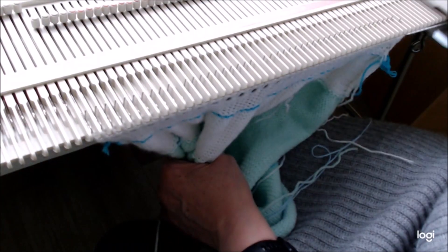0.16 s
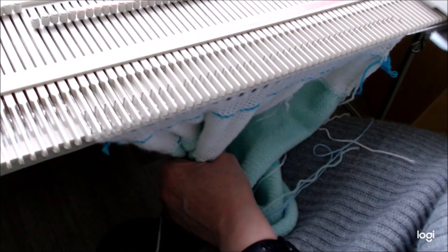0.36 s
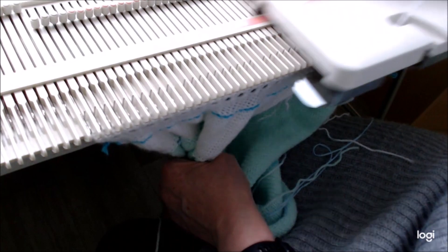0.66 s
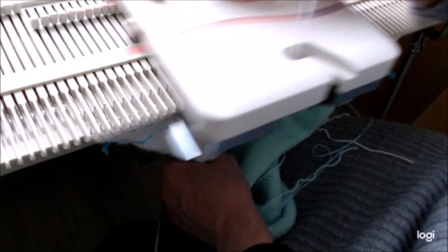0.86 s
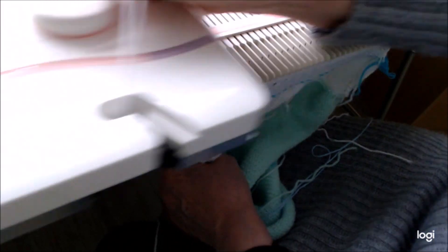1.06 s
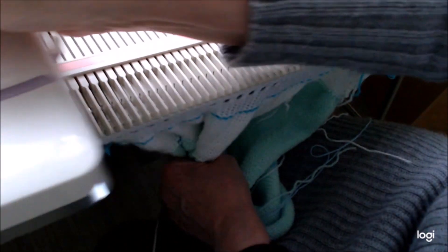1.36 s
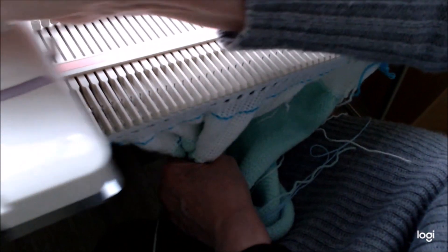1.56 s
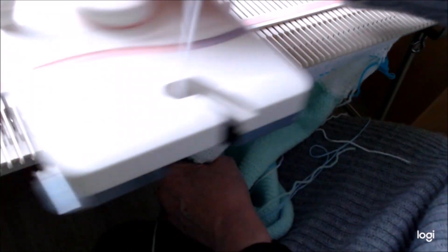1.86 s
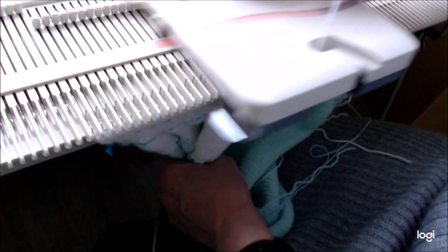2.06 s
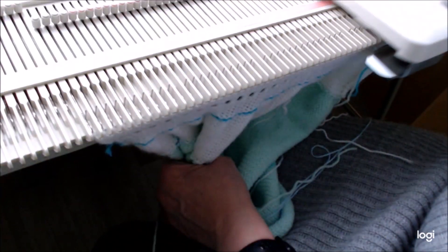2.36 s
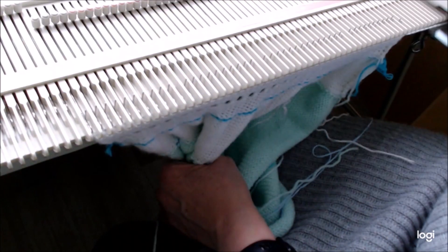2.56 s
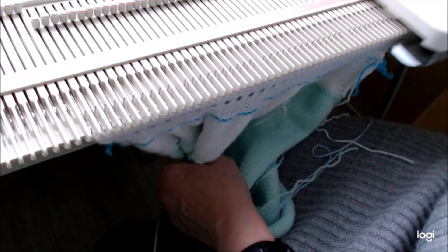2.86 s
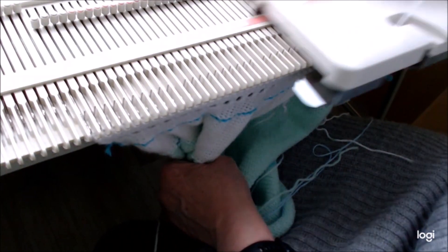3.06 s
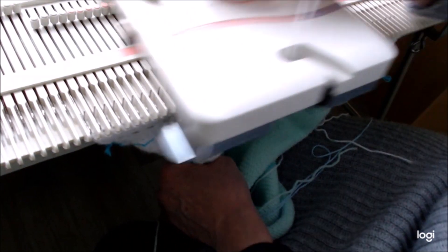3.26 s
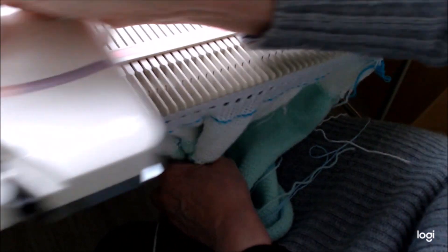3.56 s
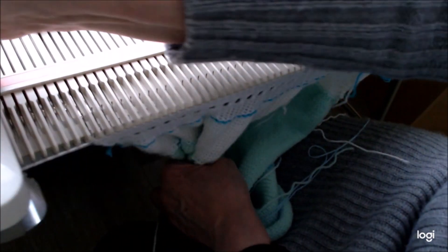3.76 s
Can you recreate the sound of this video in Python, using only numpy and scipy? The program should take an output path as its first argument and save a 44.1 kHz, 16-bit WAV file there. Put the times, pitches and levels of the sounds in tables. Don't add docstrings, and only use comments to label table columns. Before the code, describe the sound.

A knitting machine carriage is shoved back and forth over steel needles, clattering loudly between sharp lever clacks.

```python
import sys
import numpy as np
from scipy import signal
from scipy.fft import rfft, irfft, next_fast_len
from scipy.io import wavfile
from scipy.ndimage import uniform_filter1d, map_coordinates

SR = 44100
rng = np.random.default_rng(int(sys.argv[2]) if len(sys.argv) > 2 else 0)


def bounce(signal):
    frames = np.transpose(np.atleast_2d(signal))
    limited = np.clip(frames, -1, 1)
    pcm = np.round(limited * 32767).astype(np.int16)
    wavfile.write(sys.argv[1], SR, pcm)


def attenuation_scalar(level_db):
    decades = np.asarray(level_db, float) / 20
    return 10 ** decades


N = 171990


def unit(x):
    return x / np.sqrt(np.mean(x ** 2) + 1e-20)


def along(points, hz):
    freq_hz, value = np.transpose(points)
    return np.interp(np.log(hz + 1), np.log(freq_hz + 1), value)


def wobble(rate_hz):
    knots = rng.standard_normal(int(N * rate_hz / SR) + 4)
    return map_coordinates(knots, [np.arange(N) * rate_hz / SR])


def swell(start_s, length_s):
    progress = np.clip((np.arange(N) / SR - start_s) / length_s, 0, 1)
    return np.sin(np.pi * progress) ** .6


def filtered(x, response):
    m = next_fast_len(x.shape[-1] + SR // 4)
    spectrum = rfft(x, m) * response(np.fft.rfftfreq(m, 1 / SR))
    return irfft(spectrum, m)[..., :x.shape[-1]]


def causal(points):
    def response(hz):
        cepstrum = irfft(along(points, hz).clip(-90, 30) * np.log(10) / 20)
        half = len(cepstrum) // 2
        cepstrum[1:half] *= 2
        cepstrum[half + 1:] = 0
        return np.exp(rfft(cepstrum))
    return response


def resonant(peaks, hz):
    total = 1
    for centre_hz, width_hz, level_db in peaks:
        damping = 1j * hz * width_hz
        total = total + attenuation_scalar(level_db) * damping / (centre_hz ** 2 - hz ** 2 + damping)
    return total


# freq_hz [Hz], likeness [0 to 1]
LIKENESS = [(40, 0.08), (150, 0.43), (350, 0.62), (700, .55), (1400, 0), (4000, 0)]


def spread(pair):
    def mid_side(hz):
        angle = np.arccos(np.clip(along(LIKENESS, hz), -1, 1)) / 2
        return np.array([np.cos(angle), np.sin(angle)])
    mid, side = filtered(pair, mid_side)
    return np.array([mid + side, mid - side])


# freq_hz [Hz], t60_s [s]
ROOM_T60 = [(100, 0.22), (600, 0.36), (3000, 0.24), (10000, 0.19)]


def room(x):
    hz, t, z = signal.stft(rng.standard_normal((2, SR // 2)), SR, nperseg=256)
    decay = attenuation_scalar(-60 * t / along(ROOM_T60, hz)[:, None])
    tail = signal.istft(z * decay, SR, nperseg=256)[1]
    return signal.fftconvolve(x, tail / np.linalg.norm(tail[0]), axes=1)


def patchy(x):
    z = signal.stft(x, nperseg=1024)[2]
    field = uniform_filter1d(rng.standard_normal(z.shape[1:]), size=4, axis=0)
    field = uniform_filter1d(field, size=6, axis=1)
    return signal.istft(z * attenuation_scalar(2.1 * unit(field)), nperseg=1024)[1][:, :N]


# start_s [s], level_db [bed dB], weight_db [table re bed dB], bright_db [needles re bed dB]
STROKES = [
    [(.423, -36.5, 8, 14.5), (.5, -23, -2, 5), (.59, -15, 0, 4), (.75, -17, 0.5, 2), (1.01, -17.5, -1.5, 2),
     (1.15, -24.5, -5, -2), (1.25, -28, -0.5, -5.5), (1.31, -37.5, -5.5, -8.5), (1.49, -72.5, -8, 7)],
    [(1.588, -49, -17, 19), (1.63, -23, -22, -8.5), (1.72, -21, -9, 1.5), (1.78, -14.5, -1.5, 1.5),
     (1.95, -16.5, -2, 1), (2.2, -16, -3.5, 2), (2.35, -24.5, -8, -1), (2.42, -33, 2, -2),
     (2.65, -65.5, 15, -2)],
    [(2.812, -34, -2, 12.5), (2.9, -24.5, -5, 5), (2.98, -17, 0, 5), (3.2, -14.5, 1.5, 0),
     (3.42, -15.5, -3.5, 2), (3.53, -22, -2.5, -6), (3.61, -28, -5, -15), (3.73, -50.5, 1.5, -18),
     (3.9, -71, 12, -3)],
]
# start_s [s], level_db [bed dB], weight_db [table re bed dB], bright_db [needles re bed dB]
SLACK = [
    [(0, -34, 0.96, 2), (.12, -40.5, 5, -2), (.262, -68, 6.9, 4)],
    [(.272, -62, -3, 9), (.36, -59, -5, 18), (.421, -48, 6, 8.1)],
    [(1.494, -67.5, 0, 10), (1.55, -56.5, -7, 9), (1.586, -50, -11, 17)],
    [(2.68, -52, -7, 2.3), (2.77, -59, -2.5, 15), (2.81, -48, -8, 16)],
]
# start_s [s], level_db [bed dB], weight_db [table re bed dB], bright_db [needles re bed dB]
RESTS = [
    (.2, -51.5, 5, -2),
    (.22, -58, 8, -4),
    (1.43, -51, 2.3, -8),
    (2.57, -47.5, 6.7, 3),
    (2.595, -56.5, 12, -6),
    (3.7, -42, 1.7, -2),
    (3.76, -71.5, 12, -15.5),
]
# freq_hz [Hz], level_db [dB per Hz]
CLATTER_COLOUR = [(200, -24), (450, -8), (900, -4.5), (1400, -6.5), (3000, -10), (6000, -15.5),
                  (15700, -21.5)]
# freq_hz [Hz], level_db [dB per Hz]
TABLE_COLOUR = [(13, -24), (22, -5.5), (146, -2.5), (178, -5), (274, -1), (304, -2.5), (500, -5.5),
                (650, -13.5), (1100, -120)]
# freq_hz [Hz], width_hz [Hz], level_db [dB]
BED_MODES = [(131, 36, -3.5), (191, 36, -4), (349, 26, -7.5), (701, 130, 0.5), (820, 58, -21.5),
             (1185, 150, -10.5), (2180, 110, -24), (5700, 1300, -9.5)]


def carriage():
    rows = sorted(row for part in STROKES + SLACK + [RESTS] for row in part)
    start_s, *columns = np.transpose(rows)
    level_db, weight_db, bright_db = (np.interp(np.arange(N) / SR, start_s, c) for c in columns)

    hits_per_s, scatter_db, slide_db = 1800, 3, 2
    draw = rng.random((3, 2, N))
    size = attenuation_scalar(-scatter_db * np.log(draw[2] + 0.034))
    blows = (draw[0] < hits_per_s / SR) * np.sign(draw[1] - .5) * size
    drive = unit(blows) + attenuation_scalar(slide_db) * rng.standard_normal((2, N))
    clatter = filtered(drive, lambda hz: causal(CLATTER_COLOUR)(hz) * resonant(BED_MODES, hz))
    clatter = patchy(spread(clatter))

    split_hz = 1580
    bed = filtered(clatter, lambda hz: 1 / (1 + (hz / split_hz) ** 4))
    rumble = filtered(rng.standard_normal((2, N)),
                      lambda hz: attenuation_scalar(along(TABLE_COLOUR, hz)) * resonant(BED_MODES, hz))
    rumble = unit(spread(rumble))
    uneven = attenuation_scalar(.6 * wobble(25) + 1.1 * wobble(70) + .8 * wobble(200))
    steel = attenuation_scalar(bright_db + 2.0 + 0.81 * wobble(40)) * unit(clatter - bed)

    fizz_hz, fizz_db, fizz_grows = 7300, -7.5, 3.3
    chatter = filtered(blows ** 2 * np.sign(blows), lambda hz: 1 / (1 + (fizz_hz / (hz + 1)) ** 8))
    needle_db = level_db + bright_db
    steel = steel + attenuation_scalar(fizz_db + fizz_grows * (needle_db - needle_db.max())) * unit(chatter)

    ringing = uneven * (attenuation_scalar(0.8) * unit(bed) + steel)
    loaded = attenuation_scalar(weight_db + 0.8 + 3.0 * wobble(13)) * rumble
    return uneven * shell_rattle(clatter) + attenuation_scalar(level_db) * (ringing + loaded)


# start_s [s], length_s [s], pitch_hz [Hz], level_db [rms dB]
DRONES = [(0, 0.077, 128.6, -40), (0.636, 0.13, 736, -28.5), (0.873, .24, 170.5, -21),
          (1.079, 0.17, 732, -35.5), (1.11, 0.13, 131, -30.5), (1.33, 0.23, 129, -48),
          (1.855, 0.25, 275.1, -22.5), (1.863, 0.072, 676, -25.5), (2.194, 0.15, 176.7, -27.5),
          (3.46, 0.32, 130.7, -45), (3.09, 0.3, 184.2, -30)]
# start_s [s], length_s [s], pitch_hz [Hz], level_db [rms dB]
CREAKS = [
    (.15, .06, 340, -45),
    (1.524, .03, 1120, -50),
    (2.61, .09, 455, -52),
    (2.63, .05, 370, -54),
    (2.69, .07, 1110, -53),
    (3.79, .03, 470, -50),
    (3.78, .055, 335, -59),
    (3.885, .03, 460, -57),
    (3.73, .17, 500, -62),
    (3.73, .14, 1270, -64),
]


def drones():
    out, drift = np.zeros((2, N)), wobble(30)
    rough = np.array([wobble(35), wobble(35)])
    waver, rough_db = 0.0113, 2.5
    for k, (start_s, length_s, pitch_hz, level_db) in enumerate(DRONES + CREAKS):
        shift = k * SR // 7
        phase = 2 * np.pi * np.cumsum(pitch_hz * (1 + waver * np.roll(drift, shift))) / SR
        level = attenuation_scalar(level_db + 6.5 + rough_db * np.roll(rough, shift, axis=1))
        out += level * swell(start_s, length_s) * np.sin([phase, phase + 1.1])
    return out


# freq_hz [Hz], level_db [dB per Hz]
HUSH_COLOUR = [(15, -33.5), (25, -13.5), (538, -2.5), (1340, -9), (1760, -28), (15600, -52)]


def hush():
    noise = filtered(rng.standard_normal((2, N)), lambda hz: attenuation_scalar(along(HUSH_COLOUR, hz)))
    return attenuation_scalar(-86) * unit(noise)


# start_s [s], level_db [peak dB], t60_s [s]
TICKS = [(0.1074, -31, 0.035), (0.1735, -31, 0.038), (0.2728, -33, 0.035), (0.2834, -36, 0.043),
         (0.3162, -35, 0.035), (0.3297, -28, 0.035), (0.3474, -35, 0.027), (0.3664, -29, 0.048),
         (0.374, -34, 0.035), (0.3922, -26, 0.041), (1.1129, -7.5, 0.028), (1.1474, -19, 0.032),
         (1.1856, -8, 0.026), (1.235, -9.5, 0.028), (1.2664, -24, 0.035), (1.3724, -22, 0.05),
         (1.3894, -23.5, 0.035), (1.496, -38, 0.032), (1.5259, -27, 0.035), (1.5592, -16, 0.028),
         (1.577, -16.5, 0.032), (1.6192, -11.5, 0.035), (2.3496, -13, 0.032), (2.362, -12.5, 0.035),
         (2.375, -26, 0.026), (2.5272, -26, 0.04), (2.643, -40, 0.038), (2.6808, -38.5, 0.035),
         (2.7014, -41, 0.035), (2.7146, -28.5, 0.042), (2.7585, -28, 0.032), (2.781, -20, 0.029),
         (3.5174, -8, 0.031), (3.5538, -11, 0.05), (3.655, -29, 0.038), (3.6795, -18, 0.031),
         (3.6984, -31, 0.028), (3.842, -33, 0.074),
         (.0353, -24, .03),
    (.2568, -45, .012),
    (2.7905, -25, .02),
    (3.8272, -48, .012),
]
# freq_hz [Hz], width_hz [Hz], level_db [dB]
NEEDLE_MODES = [(2250, 300, 22), (3100, 350, 19), (4830, 300, 18), (6200, 510, 6)]


def needles():
    out, t = np.zeros((2, N + SR)), np.arange(SR // 12) / SR
    rise_s = .0007
    for start_s, level_db, t60_s in TICKS:
        envelope = attenuation_scalar(-60 * t / t60_s) * (1 - np.exp(-t / rise_s))
        burst = rng.standard_normal((2, len(t))) * envelope
        modes = [(hz, width, level + rng.normal(0, 2.4)) for hz, width, level in NEEDLE_MODES]
        burst = filtered(burst, lambda hz: resonant(modes, hz) * (1j * hz / (1j * hz + 1400)) ** 2)
        out[:, round(start_s * SR):][:, :len(t)] += attenuation_scalar(level_db + 1.5) * burst / np.abs(burst).max()
    return out[:, :N]


# start_s [s], level_db [peak dB], pan_db [left-right dB]
CLACKS = [(0.047, 0, -3.5), (0.422, -2, -5), (1.318, -17, -15.5), (1.326, -2, 1), (1.341, -14.5, -1),
          (1.587, -7, 0), (2.434, -1, -3), (2.81, -4, -5.5), (3.613, -14.5, -3), (3.621, -2.5, 2.5),
          (3.64, -14, 1.5)]
# freq_hz [Hz], width_hz [Hz], level_db [dB]
LEVER_MODES = [(710, 150, 15.5), (1070, 170, 16.5), (1684, 750, 4), (2410, 260, 3), (3070, 220, -5),
               (4440, 290, 2.5)]
# freq_hz [Hz], level_db [dB per Hz]
LEVER_COLOUR = [(150, -26), (500, -10), (1500, 0.5), (3100, 1), (4500, -7.5), (7000, -7.5), (15700, -12)]


def levers():
    out, t = np.zeros((2, N + SR)), np.arange(SR // 8) / SR
    crackle_s, t60_s, wet_db = .005, .024, -3
    for start_s, level_db, pan_db in CLACKS:
        burst = rng.standard_normal((2, len(t))) * attenuation_scalar(-60 * np.maximum(t - crackle_s, 0) / t60_s)
        burst = burst + 0.22 * burst[::-1]
        burst = filtered(burst, lambda hz: causal(LEVER_COLOUR)(hz) * resonant(LEVER_MODES, hz))
        burst = burst / np.abs(burst).max() * attenuation_scalar([[pan_db / 2], [-pan_db / 2]])
        sound = attenuation_scalar(wet_db) * room(burst)
        sound[:, :len(t)] += burst
        out[:, round(start_s * SR):][:, :sound.shape[1]] += attenuation_scalar(level_db - 3.5) * sound
    return out[:, :N]


# start_s [s], level_db [peak dB], pan_db [left-right dB]
CRACKS = [(0.514, -20, 0.5), (0.5346, 2.5, 2.5), (0.663, -5.5, 0.5), (0.7224, -14, 10.5), (0.7822, -12, 1),
          (0.818, -2, 3), (0.8537, -2, -3.5), (0.9242, -7.5, -5.5), (0.9588, -23, 7), (0.9872, -11, 0.5),
          (1.1129, -30, 1), (1.1853, -19.5, 4), (1.2362, -30, -4), (1.3185, -29, -2), (1.5589, -30, 0.5),
          (1.5895, -29.5, -5), (1.733, -23, 8), (1.7705, -19.5, 10.5), (1.9156, -40, -6),
          (1.9305, -14.5, -12), (1.947, -3, 4), (1.9894, -8, 0), (2.0344, -4, -12), (2.0464, -10, -3),
          (2.0916, -7.5, 5), (2.1184, -13, 3), (2.1865, -3, 2.5), (2.2617, -12.5, -11), (2.4344, -32, -5),
          (2.8106, -36.5, -4), (2.929, -8.5, 0.5), (2.9672, -9, -7.5), (3.0832, -7.5, -4), (3.191, -6, 5.5),
          (3.219, 0, -2), (3.4424, -1.5, 3)]


def cracks():
    out, t = np.zeros((2, N + SR)), np.arange(SR // 100) / SR
    t60_s = 0.0032
    for start_s, level_db, pan_db in CRACKS:
        crack = rng.standard_normal((2, len(t))) * attenuation_scalar(-60 * t / t60_s)
        crack = attenuation_scalar([[pan_db / 2], [-pan_db / 2]]) * crack
        out[:, round(start_s * SR):][:, :len(t)] += attenuation_scalar(level_db + 5) * crack
    return out[:, :N]


# start_s [s], length_s [s], level_db [rms dB]
RATTLES = [
    (0.99, .28, -26.5),
    (1.58, 0.19, -33),
    (2.236, .14, -25.5),
    (3.245, .33, -23),
]
# freq_hz [Hz], width_hz [Hz], level_db [dB]
SHELL_MODES = [(747, 210, -1), (1150, 210, 6)]


def shell_rattle(clatter):
    shell = unit(filtered(clatter, lambda hz: resonant(SHELL_MODES, hz) - 1))
    return shell * sum(attenuation_scalar(level_db) * swell(start_s, length_s) for start_s, length_s, level_db in RATTLES)


def scene():
    near = carriage() + drones() + needles()
    return near + attenuation_scalar(-11) * room(near)[:, :N] + levers() + cracks() + hush()


def roll_off(x):
    return signal.sosfilt(signal.butter(12, 15710, fs=SR, output="sos"), x)


# freq_hz [Hz], level_db [dB]
MIC = [(6900, 0), (8300, -9), (15700, -9)]
# freq_hz [Hz], pan_db [left-right dB]
MIC_BALANCE = [(40, -2), (300, -2.5), (1200, -1), (4000, -0.5), (10000, 0.4)]


def record(dry):
    x = filtered(dry, lambda hz: causal(MIC)(hz) * attenuation_scalar(np.outer([.5, -.5], along(MIC_BALANCE, hz))))
    ceiling, wrap_share = 1.01, .75
    jump = 2 * ceiling * np.round(x / (2 * ceiling))
    return roll_off(x - wrap_share * jump)


dry = scene()
out = record(dry)
bounce(out)
```